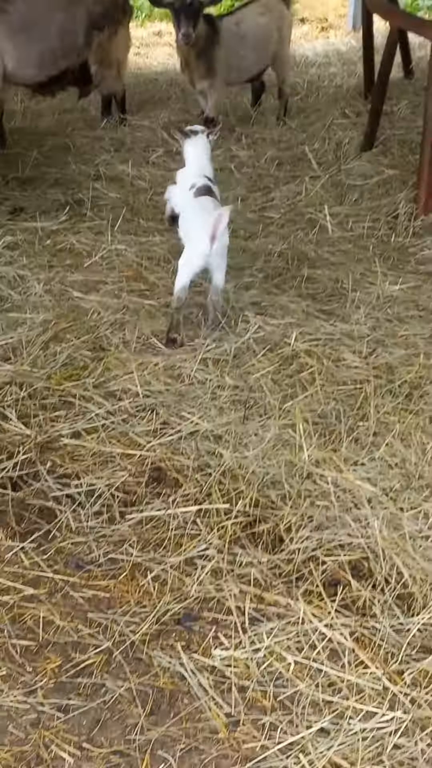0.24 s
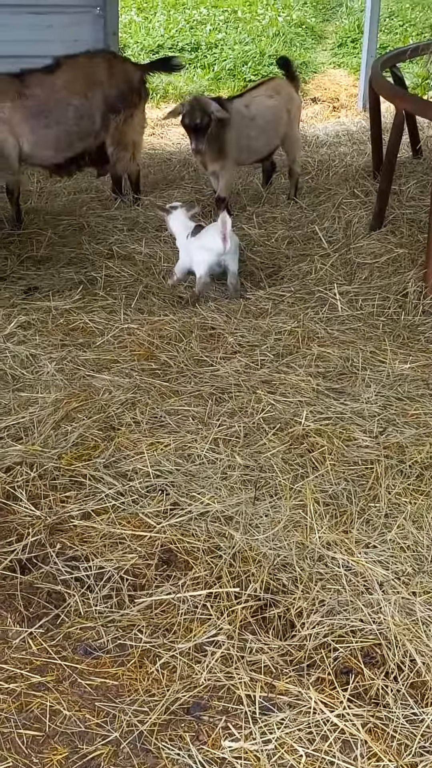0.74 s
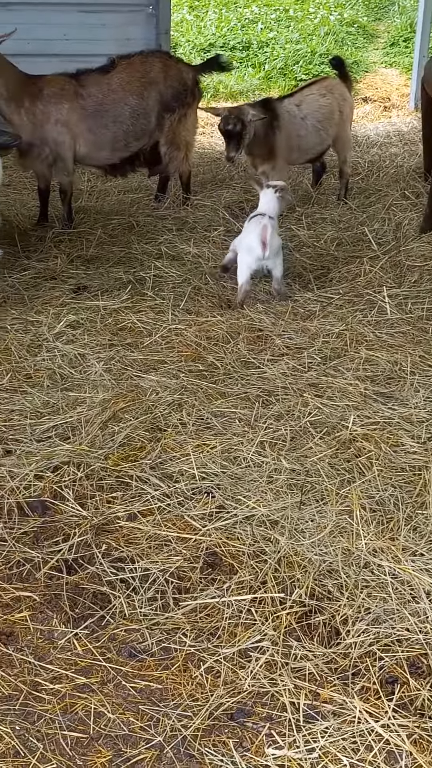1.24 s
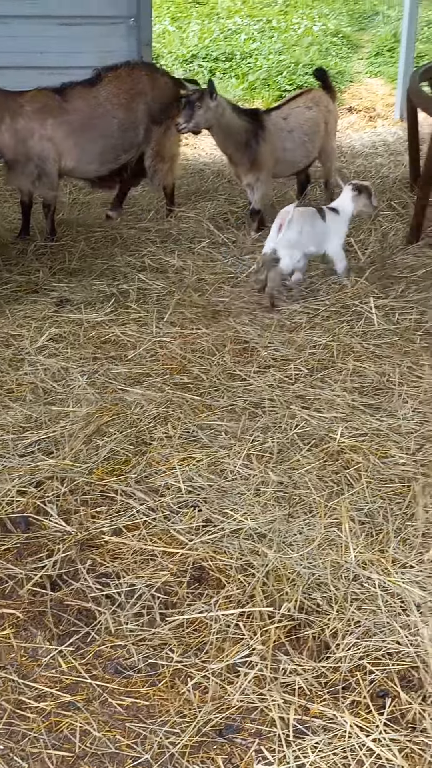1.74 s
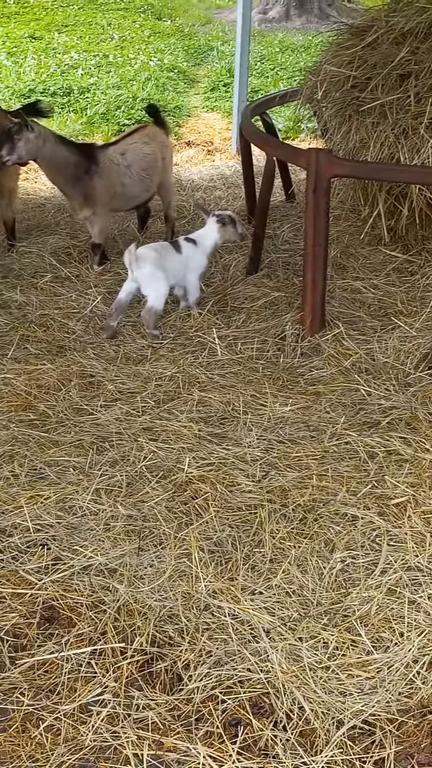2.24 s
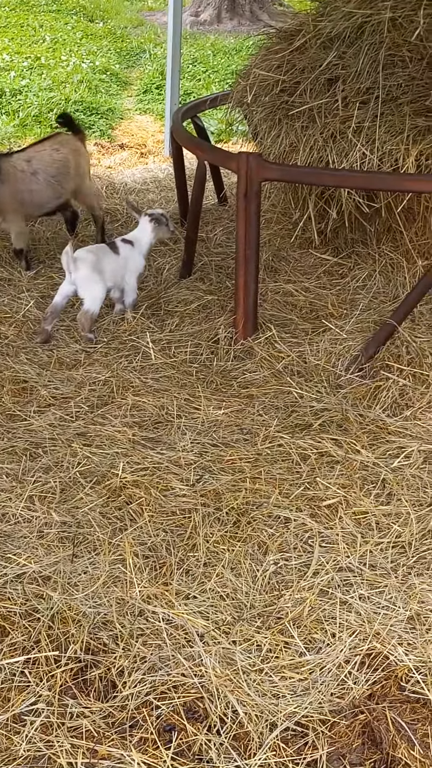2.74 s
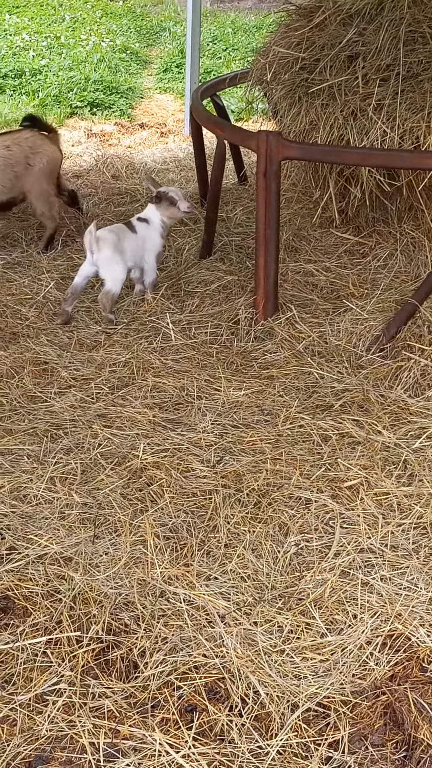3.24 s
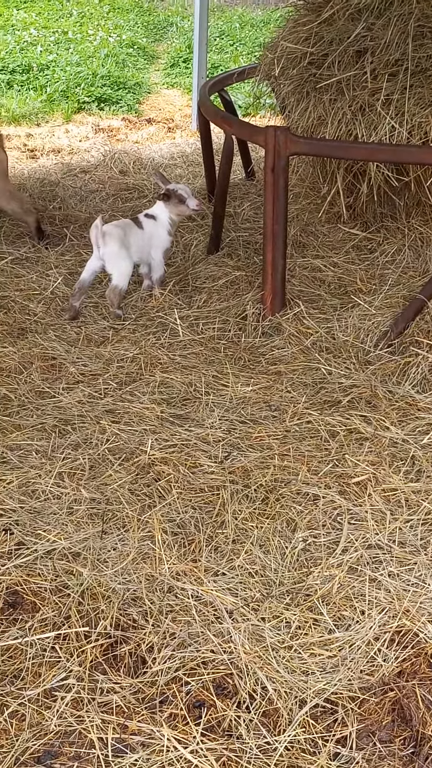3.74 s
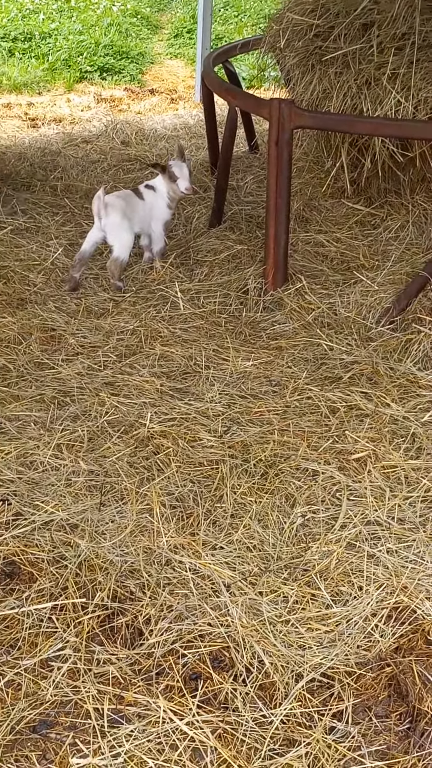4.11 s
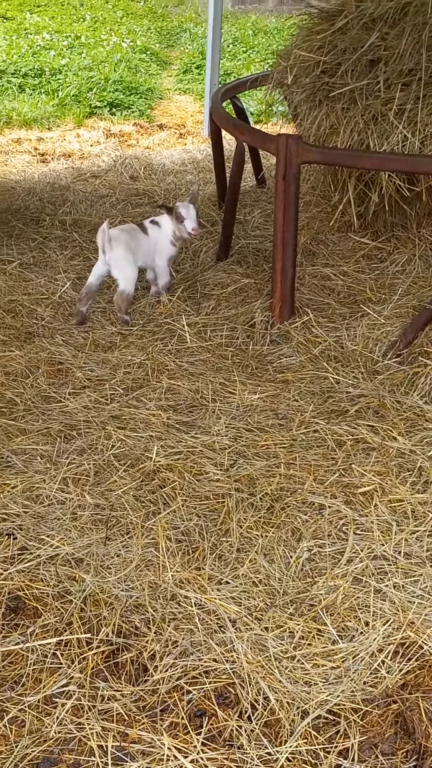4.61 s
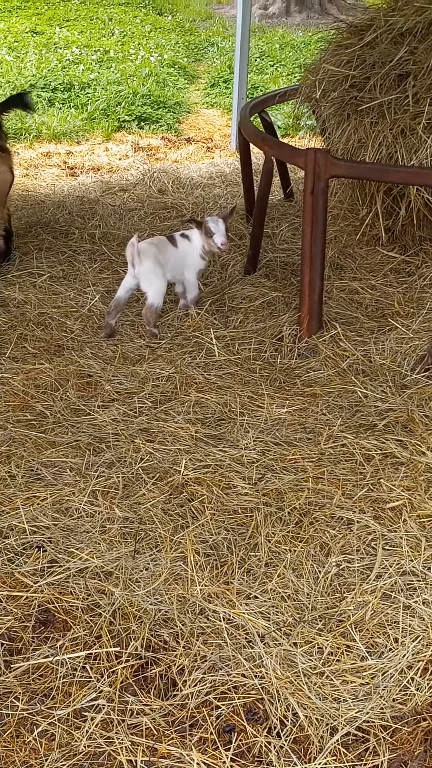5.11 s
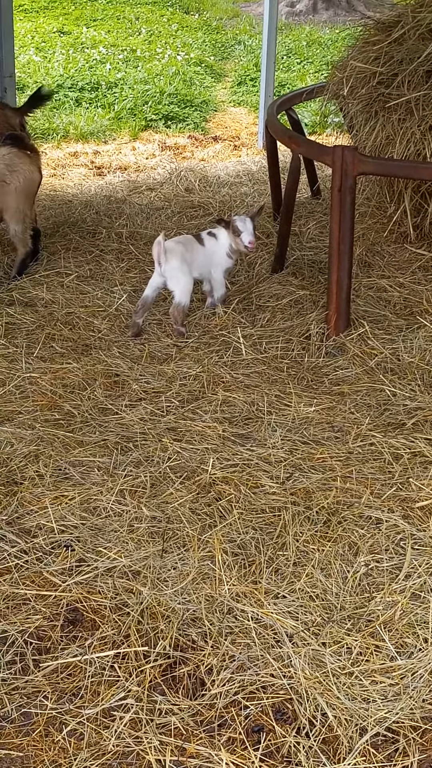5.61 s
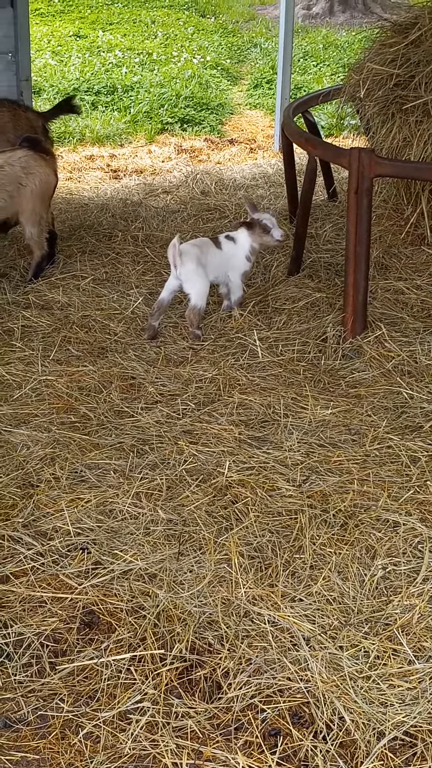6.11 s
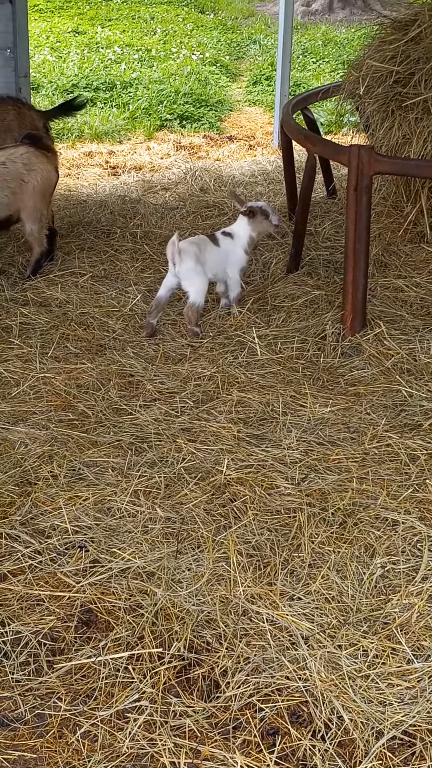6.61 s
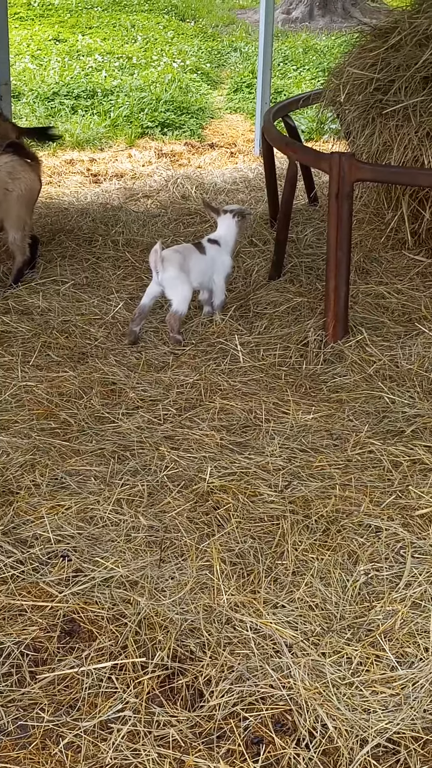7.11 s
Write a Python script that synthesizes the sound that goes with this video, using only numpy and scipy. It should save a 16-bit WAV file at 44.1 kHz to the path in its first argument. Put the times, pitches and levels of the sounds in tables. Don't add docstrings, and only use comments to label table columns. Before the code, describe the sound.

Heavy knocking steps and crackling straw under an open shed, light wind, then a kid goat bleats twice in a trembling voice.

```python
import sys
import numpy as np
from scipy import signal
from scipy.fft import rfft, irfft, next_fast_len
from scipy.io import wavfile
from scipy.ndimage import uniform_filter1d

SR = 44100
rng = np.random.default_rng(int(sys.argv[2]) if len(sys.argv) > 2 else 0)


def linear_from_db(decibels):
    return 10 ** (np.asarray(decibels, float) / 20)


def digitize_waveform(pressure):
    field = np.atleast_2d(pressure).T
    bounded = np.clip(field, -1, 1)
    quanta = np.round(bounded * 32767).astype(np.int16)
    wavfile.write(sys.argv[1], SR, quanta)


N = 324128
WEIGHT_S = 0.0022
HALF_PAN = np.array([[.5], [-.5]])


def rms_one(x):
    return x / np.sqrt(np.mean(x ** 2) + 1e-20)


def in_time(rows):
    s, *columns = np.transpose(rows)
    return [np.interp(np.arange(N) / SR, s, c) for c in columns]


def at_hz(points, hz):
    points_hz, values = np.transpose(points)
    return np.interp(np.log(hz), np.log(points_hz + 1e-9), values)


def drift(rate_hz):
    r = np.exp(-2 * np.pi * rate_hz / SR)
    settle = 20000
    slow = signal.lfilter([1], [1, -2 * r, r * r], rng.standard_normal(N + settle))
    return rms_one(slow[settle:])


def resonance(x, hz, width_hz):
    r = np.exp(-np.pi * width_hz / SR)
    zeros = np.array([1, 0, -1]) * (1 - r * r) / 2
    return signal.lfilter(zeros, [1, -2 * r * np.cos(2 * np.pi * hz / SR), r * r], x)


def band(x, low_hz, high_hz):
    return signal.sosfilt(signal.butter(3, [low_hz, high_hz], "band", fs=SR, output="sos"), x)


def shaken(modes, push):
    sound = sum(linear_from_db(db) * resonance(push, hz, width_hz) for hz, width_hz, db in modes)
    return sound / np.abs(sound).max()


def burst(s, t60, rise_s):
    t = np.arange(min(round(.5 * SR), N - round(s * SR))) / SR
    noise = rng.standard_normal((2, SR // 2))[:, :len(t)]
    return round(s * SR), noise * (1 - np.exp(-t / rise_s)) * linear_from_db(-60 * t / max(t60, .02))


def banded_noise(spectrum, patchy_db, rate_hz):
    # f/Hz, correlation
    likeness = [(60, 0.62), (180, 0.69), (550, 0.5), (1650, -0.18), (4970, -0.07), (15000, -0.15)]
    out, together = 0, drift(rate_hz)
    low_hz, top_hz = spectrum[0][0], spectrum[-1][0]
    edges = np.geomspace(low_hz, top_hz, round(2 * np.log2(top_hz / low_hz)) + 2)
    white = rng.standard_normal((2, 2, N))
    for k, (low, high) in enumerate(zip(edges, edges[1:])):
        sos = signal.butter(2, [low, high], "band", fs=SR, output="sos")
        mid, side = signal.sosfilt(sos, white[k % 2])
        hz = np.sqrt(low * high)
        alike = np.clip(at_hz(likeness, hz), -1, 1)
        gain = linear_from_db(at_hz(spectrum, hz) + patchy_db * (0.85 * together + drift(rate_hz)))
        out = out + gain * (np.sqrt(1 + alike) * mid + np.sqrt(1 - alike) * side * [[1], [-1]])
    return rms_one(out)


def gusts(rows, lull_db):
    span_db = 20
    t = np.arange(N) / SR
    for s, db, rise_s, fall_s in rows:
        away = np.maximum((s - t) / max(rise_s, .01), (t - s) / max(fall_s, .01))
        lull_db = np.maximum(lull_db, db - span_db * away)
    return lull_db


def crackle():
    cracks_per_s = 900
    sizes = linear_from_db(3.44 * np.minimum(rng.exponential(1, N), 5)) * (rng.random(N) < cracks_per_s / SR)
    left, dealt = rng.uniform(0.097, 0.64, N), rng.integers(0, 10, N)
    clicks = sizes * np.sqrt([left, 1 - left]) + 1e-18
    out = 0
    for k, hz in enumerate(np.geomspace(900, 7000, 10)):
        out = out + resonance(clicks * (dealt == k), hz, 0.12 * hz) / hz ** 0.99
    return rms_one(out)


def straw():
    # t/s, level/dB
    stirring = [(0.0, -53), (0.17, -45.5), (0.4, -53.5), (0.62, -46), (0.77, -39), (0.9, -42), (1.0, -25),
                (1.1, -40), (1.7, -51.5), (2.0, -57), (2.5, -55), (3.0, -49.5), (4.0, -48), (5.1, -56.5),
                (6.1, -57.5), (6.47, -51), (6.8, -60), (7.35, -43)]
    # t/s, stir/dB, rise/s, fall/s
    scuffs = [(.93, -31.5, 0.045, .12), (1.05, -29, .08, 0.094), (1.075, -29, .05, 0.089),
              (1.15, -38, .1, 0.2), (1.255, -42.5, 0.11, 0.17), (1.4, -41, .08, 0.12),
              (1.49, -46, .08, .08), (1.69, -43.5, 0.11, .15), (1.8, -46.5, 0.21, 0.25),
              (3.8, -40, 0.03, 0.055), (3.865, -41.5, 0.043, 0.051), (4.01, -44.5, 0.13, 0.093)]
    # t/s, level/dB
    breeze = [(0, -40), (.35, -43.5), (.7, -49), (1.5, -53.5), (2.25, -48), (2.9, -45), (3.35, -42.5),
              (3.51, -37), (3.66, -41), (4.0, -44.5), (5.15, -48), (7.35, -50)]
    # f/Hz, density/dB
    rustle_spectrum = [(530, 0), (900, -1), (1510, -4), (2160, -4.5), (3180, -7), (6940, -11), (9000, -78),
                       (11700, -56), (19800, -120)]
    hiss_spectrum = [(7600, -8), (8600, -3.5), (10200, -4), (12000, -2), (14000, 1), (16000, 5)]
    shuffle_spectrum = [(88, -49), (150, -2.5), (211, -14.5), (314, 13), (364, -7.5), (568, -3.5),
                        (1200, -21.5), (1560, -42), (2640, -120)]
    mean_stir_db, shuffle_db, crackle_db = -49, -42, -6.5
    shuffle_follows, hiss_follows = 0.76, 0.66
    (stir_db,), (breeze_db,) = in_time(stirring), in_time(breeze)
    stir_db = gusts(scuffs, stir_db)
    swing_db = stir_db - mean_stir_db
    rustle = linear_from_db(stir_db + 4.0) * banded_noise(rustle_spectrum, patchy_db=2.0, rate_hz=21)
    hiss_db = breeze_db + hiss_follows * swing_db - 3
    hiss = linear_from_db(hiss_db) * banded_noise(hiss_spectrum, patchy_db=2.4, rate_hz=6)
    shuffle = banded_noise(shuffle_spectrum, patchy_db=4.0, rate_hz=12.8)
    shuffle = linear_from_db(shuffle_db + shuffle_follows * swing_db) * shuffle
    return rustle + hiss + shuffle + linear_from_db(stir_db + crackle_db) * crackle()


def wind():
    # t/s, peak/dB, rise/s, fall/s
    swells = [(.18, -38.5, .12, 0.06), (.39, -41.5, 0.34, 0.2), (.53, -38, .07, .1),
              (.61, -23.5, 0.14, 0.09), (.71, -31, 0.21, 0.048), (1.0, -19.5, 0.014, 0.072),
              (1.35, -38, 0.057, 0.2), (1.53, -32.5, 0.1, .045), (1.6, -33.5, 0.1, 0.098),
              (2.05, -27, 0.031, 0.025), (3.07, -34.5, 0.23, 0.061), (3.32, -22, 0.052, 0.05),
              (3.559, -37, 0.085, 0.019), (3.83, -38.5, 0.15, 0.31), (4.13, -34, 0.057, 0.088),
              (4.341, -23, 0.073, 0.093), (4.758, -24, 0.089, 0.022), (4.839, -22.5, 0.024, 0.032),
              (5.018, -29, 0.051, 0.21), (5.16, -38.5, .045, 0.18), (5.416, -36, 0.083, 0.049),
              (5.81, -35, 0.18, 0.18), (6.08, -29, 0.16, 0.031), (6.14, -35, 0.027, .07),
              (6.26, -31.5, 0.059, 0.051), (6.34, -35, 0.03, 0.092), (6.535, -26.5, .022, 0.099),
              (6.74, -39.5, 0.086, 0.13), (7.06, -25, 0.071, 0.087), (7.31, -38, 0.56, 0.12)]
    # t/s, L-R/dB, lull/dB
    leeward = [(0, -29.5, -63), (.6, -6.5, -38.5), (2, -1, -59.5), (3.2, -2.5, -50.5), (3.7, -27.5, -47.5),
               (4.1, -4, -45.5), (6, -1, -54), (6.7, -2, -57), (7.35, -3.5, -52)]
    # f/Hz, density/dB
    gust_spectrum = [(12, -48), (20, -28), (32, -26), (67, 0.5), (86, 3), (139, -6), (173, -10.5),
                     (296, -19.5), (350, -20), (460, -34), (770, -120)]
    pan_db, lull_db = in_time(leeward)
    eddies = banded_noise(gust_spectrum, patchy_db=0.5, rate_hz=9.6)
    eddies[1] -= 0.54 * eddies[0]
    steady = eddies / np.sqrt(uniform_filter1d((eddies ** 2).mean(0), size=1400) + 0.031)
    level_db = gusts(swells, lull_db) + 4.0 + pan_db * HALF_PAN
    return band(linear_from_db(level_db) * steady, low_hz=45, high_hz=1500)


def insects():
    trill_hz, width_hz, level_db = 8600, 250, -70
    hiss = rng.standard_normal((2, N))
    trill = resonance(resonance(hiss, trill_hz, width_hz), trill_hz, width_hz)
    return linear_from_db(level_db) * rms_one(trill)


def hooves():
    # t/s, thud peak/dB, knock re thud/dB, crack re thud/dB, t60/s
    steps = [(0.094, -23, -15, -31, 0.075), (0.501, -27, -11, -27, 0.055), (0.535, -5, -7, -13.5, 0.17),
             (0.684, -9, -12.5, -19, 0.46), (0.702, -8, -29, -24, 0.13), (0.719, -11, -22, -16, 0.068),
             (0.943, -19.5, -6.5, -3, 0.17), (0.982, -9, -3.5, -19, 0.52), (1.099, -16, -8, -34, 0.8),
             (1.24, -37, 9, 14, 0.54), (1.334, -8, -15, -21.5, 0.31), (1.512, -13, -14.5, -45, 0.36),
             (1.64, -19.5, -18, -31, 0.34), (2.868, -15, 2.5, -3.5, 0.19), (2.884, -16, 2.5, -8.5, 0.38),
             (7.039, -31.5, -31, -7, 0.21), (7.293, -13, -15.5, -16, 0.31)]
    # f/Hz, width/Hz, level/dB
    board_modes = [(190.3, 23, 12.5), (227.7, 20, 12.5), (285, 33, 12.5), (390, 49, -43)]
    knock_modes = [(610, 33, 24.5), (770, 130, 15), (980, 740, -33), (1123, 190, 5), (1460, 940, -44),
                   (2040, 800, -2)]
    plank_modes = [(332, 30, 6.5), (433, 120, 2.5), (507, 90, 1)]
    plank_db, grit_hiss_db, herd_pan_db = -1, -23, -1
    weight = 0.6
    out = np.zeros((2, N))
    for s, db, knock_db, crack_db, t60 in steps:
        at, push = burst(s, t60, rise_s=0.0028)
        shove = weight * np.sin(np.pi * np.clip(np.arange(push.shape[1]) / SR / WEIGHT_S, 0, 1))
        push = shove + push[0] + 0.15 * push[1] * [[1], [-1]]
        thud = shaken(board_modes, band(push, 151.0, 800))
        rattle = linear_from_db(knock_db + plank_db) * shaken(plank_modes, band(push, 330, 580))
        tap = burst(s, 0.62 * t60, rise_s=0.00053)[1]
        knock = shaken(knock_modes, band(tap + 0.12 * tap[::-1], 826, 2430))
        grit = burst(s, .5 * t60, rise_s=0.0009)[1]
        crack = shaken([(3000, 1600, 0)], band(grit, 970, 8300))
        crack = crack + linear_from_db(grit_hiss_db) * band(grit, 12300, 21000)
        step = thud + rattle + linear_from_db(knock_db + 4.5) * knock + linear_from_db(crack_db - 1.0) * crack
        out[:, at:at + step.shape[1]] += linear_from_db(db) * step
    return out * linear_from_db(herd_pan_db * HALF_PAN)


def snaps():
    # t/s, peak/dB, centre f/Hz, t60/s, L-R/dB
    stalks = [(0.417, -30.5, 1870, 0.067, 1), (0.479, -36, 2480, 0.071, -2), (0.831, -22.5, 2300, 0.1, 0),
              (1.198, -31, 2500, 0.081, 1), (1.292, -24.5, 2320, 0.072, 1), (2.146, -47, 3000, 0.11, 0),
              (2.235, -35.5, 1780, 0.042, -1), (2.582, -38, 2480, 0.19, -1), (2.713, -32.5, 5100, 0.055, 3),
              (3.792, -30, 2100, 0.078, -8), (3.853, -31, 1810, 0.09, -6), (3.902, -32, 2440, 0.14, -6),
              (4.083, -20.5, 7000, 0.19, -2), (4.317, -19, 1080, 0.035, 3.5), (4.53, -21, 1190, 0.025, 1),
              (6.207, -34.5, 2500, 0.32, -1), (6.431, -30, 3000, 0.19, 0), (6.485, -19, 1610, 0.12, -3),
              (6.504, -23.5, 970, 0.27, 1), (6.525, -25.5, 3040, 0.082, 1), (7.264, -32, 2400, 0.37, 0)]
    thick_hz = 1300
    splinter_db, thin_hz = -14, 2500
    out = np.zeros((2, N))
    for s, db, hz, t60, pan_db in stalks:
        thin = hz > thick_hz
        at, puff = burst(s, t60, rise_s=0.004 if thin else 0.0012)
        body = shaken([(hz, 0.5 * hz, 0)], band(puff, 280, 6100 if thin else 1.46 * hz))
        splinters = linear_from_db(splinter_db) * min(hz / thin_hz, 2) ** 2 * band(puff, 5000, 13000)
        out[:, at:at + puff.shape[1]] += linear_from_db(db + pan_db * HALF_PAN) * (body + splinters)
    return out


def joist():
    # t/s, peak/dB
    shoves = [(.543, -13), (.552, -12), (.693, -14), (.705, -8), (.716, -8), (.723, -11), (.985, -5),
              (.998, -6), (1.012, -12), (1.115, -20), (1.14, -21), (1.343, -15), (1.35, -14), (1.363, -17),
              (1.42, -22), (1.545, -21), (1.585, -23), (2.9, -17), (2.912, -16), (2.928, -17), (2.942, -19),
              (2.975, -24)]
    # f/Hz, width/Hz, level/dB
    beam_modes = [(190, 45, 0.5), (265, 60, 1.5), (350, 80, -3), (450, 110, -8)]
    s, db = np.transpose(shoves)
    pushes = np.zeros(N)
    pushes[(s * SR).astype(int)] = linear_from_db(db)
    soft = np.r_[np.hanning(round(WEIGHT_S * SR)), np.zeros(SR // 5)]
    return signal.fftconvolve(pushes, shaken(beam_modes, band(soft, 130, 900)))[:N]


def birds():
    # t/s, from f/Hz, to f/Hz, length/s, level/dB
    chirps = [
        (1.269, 5800, 7200, 0.011, -36.5),
        (2.832, 5500, 7100, 0.0073, -25.5),
        (4.243, 5800, 7100, 0.0102, -20),
    ]
    # t/s, length/s, end f/Hz, top f/Hz, level/dB
    arches = [
        (6.283, .224, 2650, 3115, -40.5),
        (7.012, .046, 2900, 3380, -35),
    ]
    # t/s, length/s, from f/Hz, settled f/Hz, level/dB
    hooks = [
        (5.85, .06, 2970, 2860, -50),
        (6.82, .095, 2800, 2370, -52),
        (6.985, .03, 2880, 2960, -50),
        (7.052, .078, 2950, 2443, -48),
    ]
    settle_s, arch_swell_db = .012, 12
    out, t = np.zeros(N), np.arange(N) / SR
    notes = []
    for s, length_s, end_hz, top_hz, db in arches:
        arch = np.sin(np.pi * np.clip((t - s) / length_s, 0, 1) ** 1.15) ** .75
        notes.append((s, length_s, end_hz + (top_hz - end_hz) * arch, db - arch_swell_db * (1 - arch)))
    for s, length_s, from_hz, hz, db in hooks:
        glide = np.exp(-np.maximum(t - s, 0) / settle_s)
        notes.append((s, length_s, hz + (from_hz - hz) * glide, db))
    for s, length_s, hz, db in notes:
        ends = np.clip(np.minimum(t - s, s + length_s - t) / 0.0074, 0, 1)
        level = np.sqrt(2) * linear_from_db(db - 2.5 + 3.2 * drift(31))
        out += level * ends * np.sin(2 * np.pi * np.cumsum(hz) / SR)
    for s, from_hz, to_hz, length_s, db in chirps:
        part = np.clip((t - s) / length_s, 0, 1)
        hz = from_hz + (to_hz - from_hz) * part
        out += linear_from_db(db) * np.sin(np.pi * part) * np.sin(2 * np.pi * np.cumsum(hz) / SR)
    return out


def bleat(throbs, mouth):
    # f/Hz, width/Hz, level/dB
    throat = [(1723, 113, 11.5), (1150, 800, -8.5), (2120, 720, -9.5), (3260, 320, -5.5), (4347, 390, 1.5),
              (5850, 670, 2), (7290, 706, 1), (10270, 2100, -19.5), (11330, 1200, -17.5),
              (14200, 2500, -29.5)]
    climb_hz_per_s, scoop_hz_per_s = 500, 1300
    kick_hz, sag_hz = 15, 36
    swell_db_per_s, onset_db, slack_db = 252, 17.5, 11.5
    hold_s = 0.0086
    breathy, jitter, unsteady = .36, .013, .03
    spread_rad, patchy_db, uneven_db = .09, .2, 1.2
    slack_mouth_db, slack_low_db, slack_cheek_db, slack_top_db = -5, -18, 2.5, -1
    nose_hz, nose_width_hz = 1520, 170

    start_s, top_s, top_hz, top_db, hoarse = np.transpose(throbs)
    span = slice(round(start_s[0] * SR), round((top_s[-1] + .03) * SR))
    t = np.arange(N)[span] / SR
    opening, hum_db, effort_db, bright_db = [c[span] for c in in_time(mouth)]

    def along(times, values):
        return np.interp(t, np.ravel(times, "F"), np.ravel(values, "F"))

    climb_s = top_s - start_s
    climb_rates = np.r_[scoop_hz_per_s, np.full(len(throbs) - 2, climb_hz_per_s), 0]
    start_hz = top_hz - climb_s * climb_rates
    kick_s, sag_s = np.maximum(top_s - .022, start_s + .002), top_s + .022
    held_hz = np.maximum(top_hz - kick_hz, start_hz)
    pitch = along([start_s, kick_s, top_s, sag_s], [start_hz, held_hz, top_hz, top_hz - sag_hz])
    pitch = uniform_filter1d(pitch, size=420)

    swelling_db = (top_db - swell_db_per_s * climb_s)[1:-1]
    start_db = np.r_[top_db[0] - onset_db, swelling_db, top_db[-2] - slack_db]
    level_db = along([start_s, top_s, top_s + hold_s], [start_db, top_db, top_db])
    level_db = uniform_filter1d(level_db, size=600) + effort_db

    slack_s = np.minimum(top_s + .03, np.append(start_s[1:], 9) - .001)
    calm_s = np.ravel([start_s, .6 * start_s + .4 * top_s, top_s + .006, slack_s], "F")
    slack = np.interp(t, calm_s, np.tile([1.0, 0.041, 0.052, 1], len(throbs)))
    rough = np.maximum(slack, along([start_s, top_s], [hoarse, hoarse]))

    cycles = np.cumsum(pitch * (1 + jitter * (rough + unsteady) * drift(365)[span])) / SR
    pulses = 0
    for k in range(2, 28):
        waver = linear_from_db(patchy_db * min(k, 12) * drift(49)[span])
        pulses = pulses + waver * np.cos(2 * np.pi * k * cycles + spread_rad * k * k)
    pulses = pulses / np.sqrt(12.5)
    air = rng.standard_normal(len(t)) * (1 + 0.49 * np.cos(2 * np.pi * cycles))
    source = pulses * (1 - 0.44 * rough) + breathy * rough * band(air, low_hz=3900, high_hz=15800)

    modes = []
    for k, (hz, width_hz, db) in enumerate(throat):
        gain = (-1) ** k * linear_from_db(db + uneven_db * drift(32.0)[span])
        modes.append(gain * resonance(source, hz, width_hz))
    front = np.clip(opening, 0, 1.5) * linear_from_db(slack_mouth_db * rough) * modes[0]
    low = linear_from_db(slack_low_db * rough) * modes[1] + linear_from_db(slack_cheek_db * rough) * modes[2]
    low = low - np.clip(1 - opening, 0, 1) * resonance(low, nose_hz, nose_width_hz)
    high = sum(modes[5:7]) + linear_from_db(slack_top_db * rough) * sum(modes[7:])
    voice = front + low + sum(modes[3:5]) + linear_from_db(bright_db) * high

    hum_level = np.sqrt(2) * linear_from_db(hum_db + 0.6 * (level_db - top_db.max()))
    hum = hum_level * np.cos(2 * np.pi * np.cumsum(pitch) / SR)
    fade = np.clip((t[-1] - t) / 0.044, 0, 1) * np.clip((t - t[0]) / 0.0028, 0, 1)
    out = np.zeros(N)
    out[span] = fade * (linear_from_db(level_db + 6.0) * rms_one(voice) + hum)
    return out


def ports(x):
    # f/Hz, phase/rad
    port_phase = [(100, 0), (1800, 1), (4500, 2.0), (5800, 3.4), (7240, 4.8), (7800, 6.1), (9500, 4.9),
                  (11000, 5.8), (16000, 6.5)]
    # f/Hz, L-R/dB
    port_balance = [(500, 1), (1170, -2), (2700, -1.5), (6400, -2), (7700, -1), (8600, 4), (10500, 4),
                    (12500, .5), (15000, 0)]
    size = next_fast_len(N)
    hz = np.arange(1, size // 2 + 2) * SR / size
    lead = np.exp(.5j * np.interp(hz, *np.transpose(port_phase)))
    half = linear_from_db(at_hz(port_balance, hz) / 2) * lead
    return irfft(rfft(x, size) * np.array([half, 1 / half]), size)[:, :N]


def place(x, pan_db, lag_s):
    n = np.arange(N)
    late = np.interp(n - lag_s * SR, n, x)
    return np.array([x * linear_from_db(pan_db / 2), late * linear_from_db(-pan_db / 2)])


def shed(x):
    t60_s, roof_cut_hz = 0.33, 12800
    size = next_fast_len(N + SR)
    w = 2 * np.pi * np.arange(size // 2 + 1) / size
    dull = 1 / (1 + 1j * w * SR / (2 * np.pi * roof_cut_hz))
    out, spectrum = np.zeros((2, N)), rfft(x, size)
    for k, lag in enumerate(rng.uniform(.006, .03, 20) * SR):
        loop = linear_from_db(-60 * lag / SR / t60_s) * dull * np.exp(-1j * w * round(lag))
        out[k % 2] += irfft(spectrum * loop / (1 - loop), size)[:N] * (-1) ** (k // 2)
    return out


def scene():
    # start/s, top/s, top pitch/Hz, top/dB, hoarseness 0-1
    bleats = [
        [(4.075, 4.13, 500, -27, .75), (4.168, 4.205, 562, -23, .05), (4.238, 4.286, 576, -23, .55),
         (4.298, 4.308, 562, -16, .15), (4.345, 4.384, 582, -15, .03), (4.431, 4.48, 594, -13, .03),
         (4.542, 4.589, 568, -16, .03), (4.642, 4.695, 553, -16.5, .03), (4.757, 4.814, 558, -16.5, .03),
         (4.857, 4.916, 573, -16, .03), (4.965, 5.0, 530, -41, .8)],
        [(5.238, 5.273, 551, -16, .03), (5.313, 5.352, 590, -15, .03), (5.398, 5.444, 593, -14, .03),
         (5.487, 5.537, 584, -16, .03), (5.585, 5.648, 561, -16, .03), (5.705, 5.76, 529, -19, .03),
         (5.805, 5.845, 485, -42, 1)],
    ]
    # t/s, opening 0-1, nasal hum/dB, extra effort/dB, brightness/dB
    mouths = [
        [(4.07, 0.67, -19, 5, -2.5), (4.15, 1, -23, -9, -3), (4.195, 0.07, -12.5, -4.5, -2),
         (4.31, 0.47, -10, -7.5, 3), (4.38, 0.44, -22, -8, 5.5), (4.47, 0.52, -30, -6.5, -2),
         (4.59, 0.46, -38, -7.5, 0), (4.92, 0.46, -34.5, -7.5, 0), (5.0, 0.8, -32, -11, 5)],
        [(5.25, 0.64, -39, -3, -5), (5.3, 0.73, -36, -8.5, 2.5), (5.35, 0.58, -32, -6.5, 1.5),
         (5.44, 0.5, -36, -6.5, 1), (5.54, 0.53, -31.5, -6.5, 2), (5.65, 0.52, -40, -9.5, 2),
         (5.76, 0.65, -57, -6, 1), (5.85, 1, -27, -7, -10)],
    ]
    shed_db = -12.5
    kid, song, feet = sum(map(bleat, bleats, mouths)), birds(), hooves() + joist()
    near = ports(kid) + place(song, pan_db=-4.5, lag_s=0.000426)
    room = linear_from_db(shed_db) * shed(.7 * kid + .35 * song + .4 * feet.mean(0))
    return near + room + feet + snaps() + straw() + wind() + insects()


def roll_off(x):
    return signal.sosfilt(signal.butter(12, 15860, fs=SR, output="sos"), x)


def record(dry):
    cut = signal.sosfilt(signal.cheby2(12, 70, 16760, fs=SR, output="sos"), dry)
    mix = np.clip(cut, -.97, .97)
    return roll_off(mix)


dry = scene()
out = record(dry)
digitize_waveform(out)
```